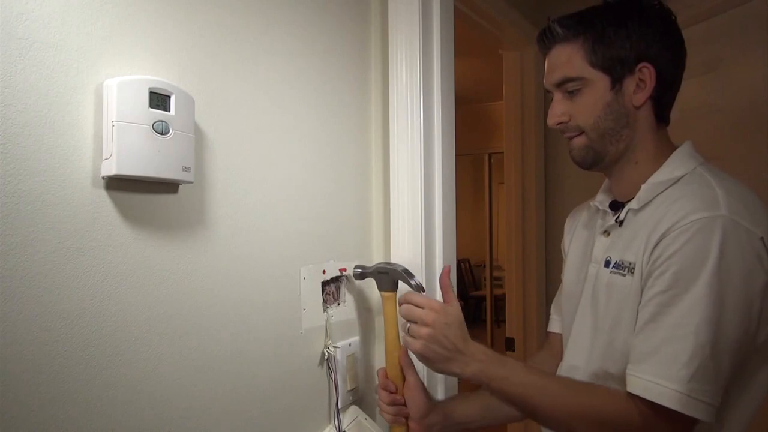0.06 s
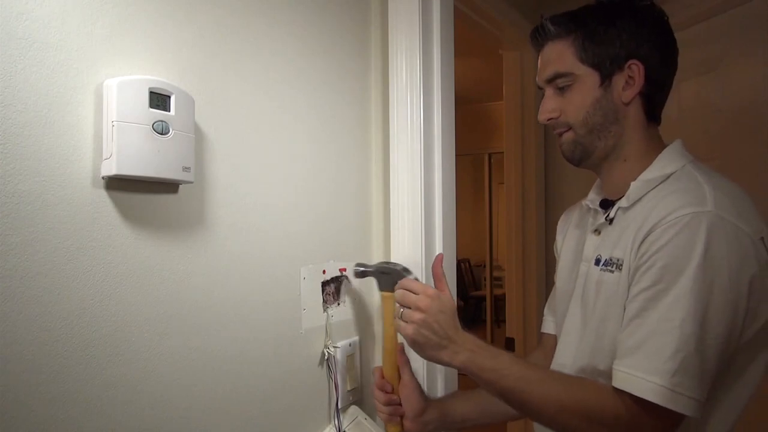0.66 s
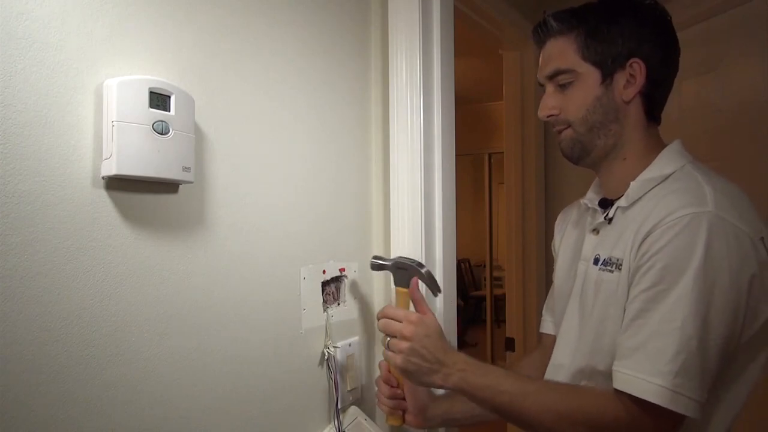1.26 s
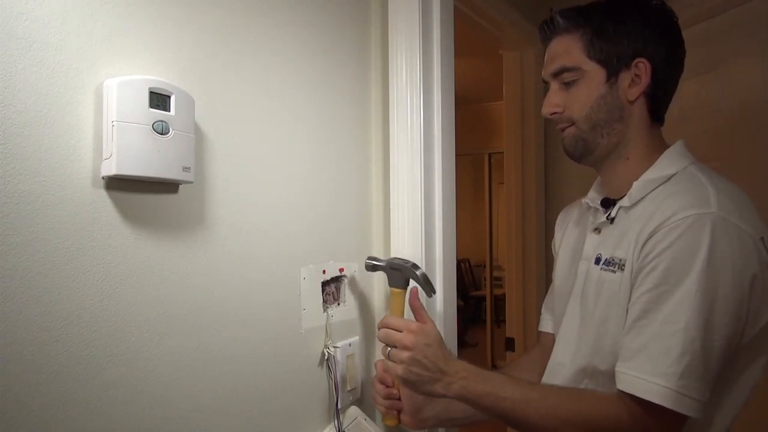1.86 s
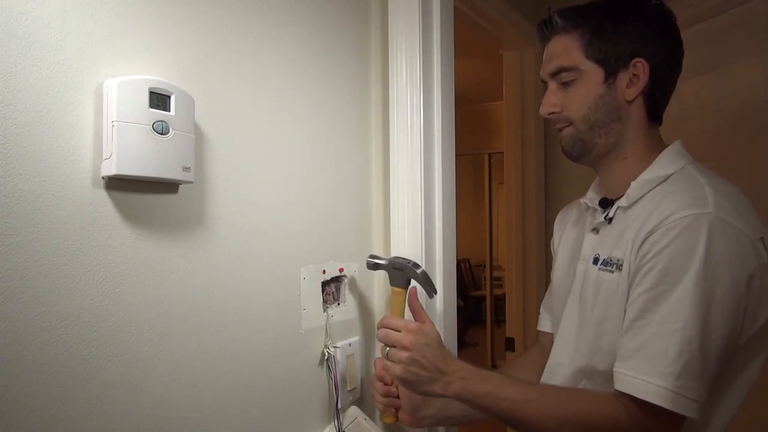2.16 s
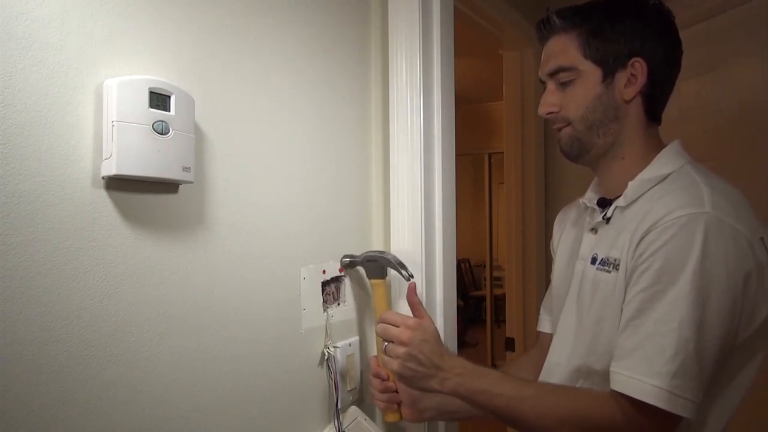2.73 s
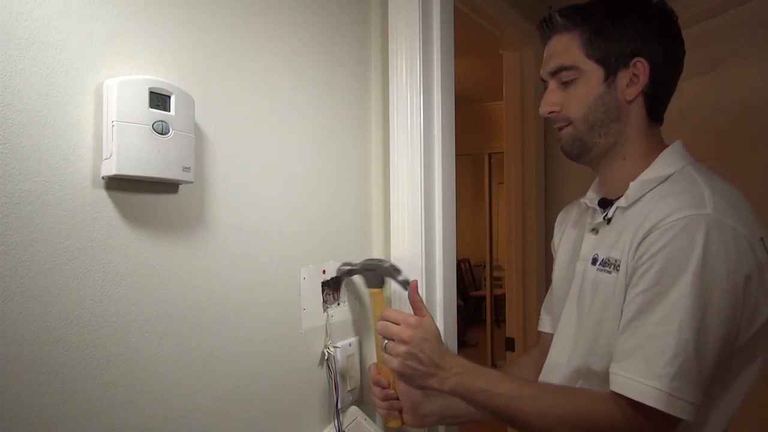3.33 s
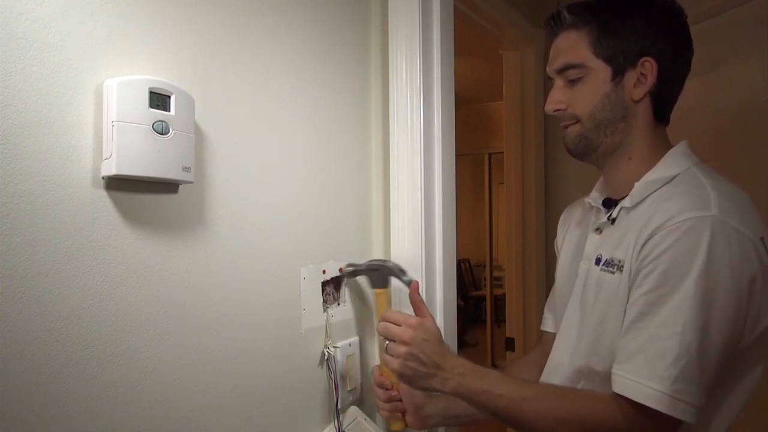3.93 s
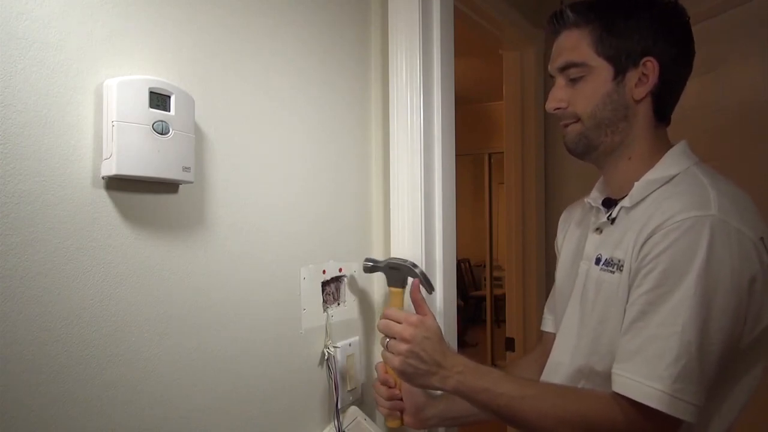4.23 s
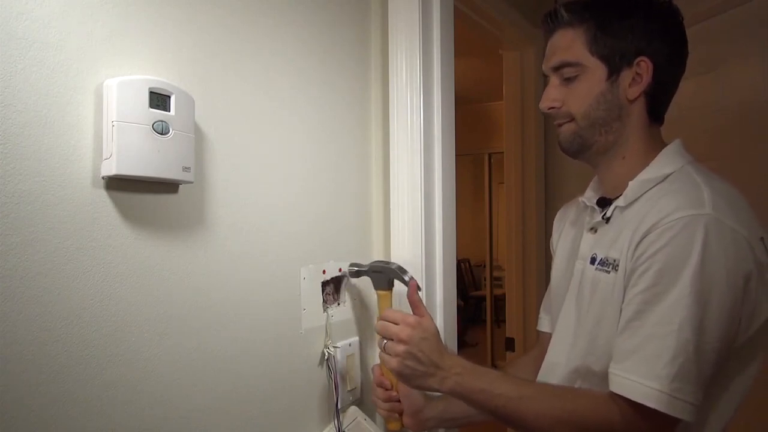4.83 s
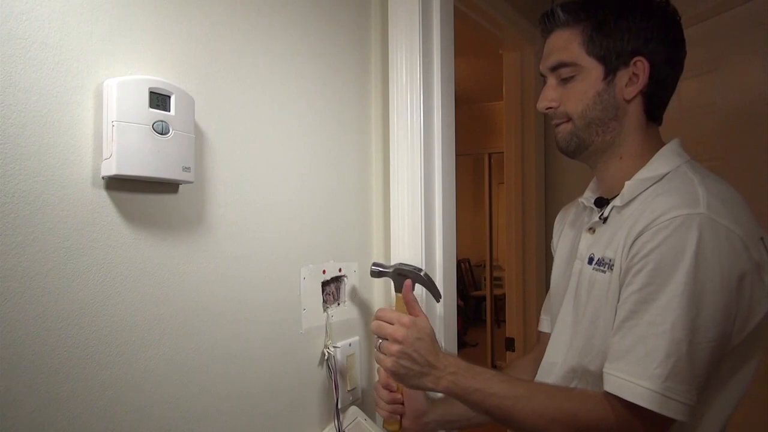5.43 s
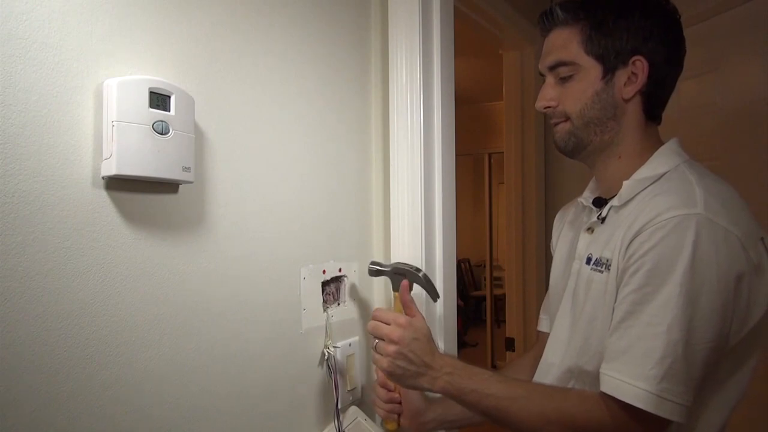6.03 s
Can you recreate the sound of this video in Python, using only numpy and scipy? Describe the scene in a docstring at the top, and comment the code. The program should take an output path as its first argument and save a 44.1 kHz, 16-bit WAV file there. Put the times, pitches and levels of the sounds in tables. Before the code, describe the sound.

A steel hammer taps a plastic anchor into a hollow plasterboard wall, sixteen blows at about three a second. Each has a click, a dull or bright snap and a short boom from the wall. The knock grows fuller as the anchor seats, and the last four blows have a muffled rebound, the final one coming after a brief pause. The microphone is close, in a small hallway with a low rumble.

```python
"""A small hallway: a claw hammer taps a plastic anchor into a hollow plasterboard wall, sixteen blows.
Each blow clicks, booms the wall panel and sets board and room ringing; where the plastic slips it
adds a snap, dull or bright. As the anchor seats the knock deepens, and a dull rebound follows each
of the last four blows. A limiter holds the peaks over a low room rumble."""
import sys
import numpy as np
from scipy import signal
from scipy.fft import rfft, irfft, next_fast_len
from scipy.io import wavfile
from scipy.ndimage import uniform_filter1d, minimum_filter1d

SR = 44100
rng = np.random.default_rng(int(sys.argv[2]) if len(sys.argv) > 2 else 0)


def unload_wav(signal):
    """Save mono or channel-first audio to the path in sys.argv[1] as 16-bit WAV at rate SR, clipped to [-1, 1]."""
    wavfile.write(
        sys.argv[1],
        SR,
        np.round(np.clip(np.atleast_2d(signal).T, -1, 1) * 32767).astype(np.int16),
    )


N = 268128
SIZE = 32768  # samples in one hit; hits are shaped as spectra over HZ
HZ = np.fft.rfftfreq(SIZE, 1 / SR)
AGE = np.arange(SIZE) / SR  # seconds since contact

# tone of the dense ringing of board and hallway: freq_hz, level_db
RING_EQ = [(40, 2.5), (130, 21.5), (220, 27), (285, 25.5), (370, 29), (550, 25), (850, 21.5), (1050, 16),
           (1550, 12), (1900, 10), (2200, 4), (3300, 3), (5800, -8), (7800, -18), (13000, -30)]


def amp(db):
    """Decibels to gain."""
    return 10 ** (np.asarray(db) / 20)


def along(points, hz):
    """Read a curve of (freq_hz, value) points on a log frequency axis."""
    freqs, values = np.transpose(points)
    return np.interp(np.log(hz + 1), np.log(freqs + 1), values)


def eq(points):
    """Minimum-phase EQ through (freq_hz, gain_db) points: nothing rings ahead of the attack."""
    cepstrum = irfft(np.log(amp(along(points, HZ))))
    cepstrum[1:SIZE // 2] *= 2
    cepstrum[SIZE // 2 + 1:] = 0
    return np.exp(rfft(cepstrum))


def noise(points):
    """Steady noise of rms 1, coloured by (freq_hz, gain_db) points."""
    size = next_fast_len(N + SIZE)
    colour = amp(along(points, np.fft.rfftfreq(size, 1 / SR)))
    x = irfft(rfft(rng.standard_normal(size)) * colour, size)[:N]
    return x / np.std(x)


def place(track, start_s, db, hit):
    """Lay a hit into the track with its tail faded out."""
    fade = np.clip((AGE[-1] - AGE) * 10 - 1, 0, 1)
    part = track[round(start_s * SR):][:SIZE]
    part += (amp(db) * fade * hit)[:len(part)]


def room_tone(rumble_db=-33, air_db=-50, hiss_db=-67.5, fall_db=4):
    """The building's low rumble, with a faint rush of air and a thin hiss that both slowly sink."""
    # colours of the three noise beds: freq_hz, gain_db
    rumble_eq = [(15, -7.5), (40, 0.5), (72, -2.5), (105, -25), (145, -10), (180, -9.5), (230, -18.5),
                 (320, -27.5), (600, -64)]
    air_eq = [(150, -9), (380, 1.5), (560, 0.5), (720, 3), (1100, -4), (1550, -7.5), (2100, -13.5),
              (4000, -19), (7000, -26.5)]
    hiss_eq = [(1000, -5), (3000, 3), (7000, 4.5), (16000, -2.5)]
    sink_db = fall_db * np.arange(N) / N
    air = amp(air_db - sink_db) * noise(air_eq)
    hiss = amp(hiss_db - sink_db) * noise(hiss_eq)
    return amp(rumble_db) * noise(rumble_eq) + air + hiss


def diffuse(early_db=7, early_s=0.0078, rise_s=0.0005, smooth_hz=90):
    """Spectrum of countless modes and reflections: strong near walls, then a tail dying by band."""
    # decay of board and hallway: freq_hz, t60_s
    decay = [(100, 0.65), (400, 0.38), (1200, 0.33), (3000, 0.46), (6000, 0.36), (11000, 0.17)]
    hz, t, bands = signal.stft(rng.standard_normal(SIZE), SR, nperseg=256)
    bands = bands * amp(-60 * t / along(decay, hz)[:, None])
    tail = signal.istft(bands, SR, nperseg=256)[1][:SIZE]
    near_walls = amp(early_db * np.exp(-AGE / early_s))
    response = rfft(tail * near_walls * (1 - np.exp(-AGE / rise_s)))
    bell = signal.windows.hann(2 * int(smooth_hz / HZ[1]) + 1)
    power = signal.convolve(np.abs(response) ** 2, bell / bell.sum(), mode="same", method="direct")
    return response / np.sqrt(power)  # equal energy in every band


def ringing(spot):
    """Board and hallway ring: one spot sounds alike each time in the bass, different in the treble."""
    # part of the ringing that changes from blow to blow: freq_hz, power_share
    variation = [(200, 0.05), (900, 0.03), (2200, 0.07), (5000, 0.5)]
    fresh = along(variation, HZ)
    return (np.sqrt(1 - fresh) * spot + np.sqrt(fresh) * diffuse()) * eq(RING_EQ)


def brushes(t60_s=0.28):
    """Hand and hammer brush the wall between blows: a thin ring, cut short by an extra decay."""
    # light touches: start_s, level_db
    touches = [(1.002, -13), (1.013, -13.5)]
    # thin tone of a light contact: freq_hz, gain_db
    light_eq = [(100, -20), (450, -10), (800, 0), (1150, 3), (1700, -2), (3000, 0), (8000, 0)]
    track = np.zeros(N)
    for start_s, db in touches:
        ring = irfft(diffuse() * eq(RING_EQ) * eq(light_eq))
        place(track, start_s, db, ring * amp(-60 * AGE / t60_s))
    return track


def thud():
    """The board around the anchor gives under the blow and springs back within a few swings."""
    # heavily damped swings: pitch_hz, level_db, peak_s
    swings = [(109.6, -12.5, 0.0093), (196, -16.5, 0.0071)]
    hz, db, peak_s = np.transpose(swings)[:, :, None]
    swell = AGE / peak_s * np.exp(1 - AGE / peak_s)
    return rfft(np.sum(amp(db) * swell * np.sin(2 * np.pi * hz * AGE), axis=0))


def panel_boom(scatter_db=1, rise_s=0.0056):
    """The wall's modes start together; the lowest swings against the rest, beating with the next."""
    # modes of the panel and, above 2 kHz, of anchor and hammer head: pitch_hz, level_db, t60_s
    wall_modes = [(34.54, -15.5, 0.69), (47.13, -16, 0.55), (86.7, -21, 0.44), (107.8, -18.5, 0.4),
                  (131.2, -32, 0.53), (146.9, -19.5, 0.49), (176.6, -19, 0.42), (207.2, -23.5, 0.53),
                  (236, -26.5, 0.53), (351.4, -24, 0.44), (399.6, -25, 0.39), (486.7, -18, 0.15),
                  (514, -28, 0.38), (658, -31, 0.18), (757, -43, 0.39), (843.6, -21, 0.14),
                  (870, -22.5, 0.094), (927, -33.5, 0.22), (1015, -37, 0.37), (1169, -22.5, 0.095),
                  (1320, -52, 0.18), (1850, -41, 0.32), (2400, -39, 0.18), (2690, -54, .25),
                  (3260, -57, 0.16), (3460, -54, 0.16)]
    hz, db, t60 = np.transpose(wall_modes)[:, :, None]
    polarity = np.where(hz == hz.min(), 1, -1)
    envelope = amp(db + scatter_db * rng.standard_normal(db.shape) - 60 * AGE / t60)
    boom = np.sum(polarity * envelope * np.sin(2 * np.pi * hz * AGE), axis=0)
    return rfft(boom * (1 - np.exp(-AGE / rise_s)))


def rebounds(push, spot):
    """The hammer lands a second time, softly: a muffled knock with little ringing."""
    # second contacts: start_s, level_db
    bounces = [(4.4155, -4), (4.7851, 0), (5.1685, -1), (5.83, 1)]
    # dull tone of a soft contact: freq_hz, gain_db
    soft_eq = [(60, -10), (250, 0), (1200, 0), (2500, -8), (6000, -22)]
    track = np.zeros(N)
    for start_s, db in bounces:
        knock = amp(0.5) * push + amp(-2) * thud() + amp(-8.5) * ringing(spot)
        place(track, start_s, db, irfft(knock * eq(soft_eq)))
    return track


def anchor_slip(snap_db, reach_hz, from_hz=1710, slope=6.9):
    """A blow's colour in dB: bare contact plus plastic snap, reaching higher the more abrupt the slip."""
    # tone of a blow that does not move the anchor: freq_hz, gain_db
    bare_eq = [(1260, -0.5), (2580, -5.5), (3570, -9.5), (5640, -2.5), (8000, -2.5)]
    snap_band = 1 / (1 + (from_hz / (HZ + 1)) ** slope) / (1 + (HZ / reach_hz) ** slope)
    return 10 * np.log10(amp(along(bare_eq, HZ)) ** 2 + amp(snap_db) ** 2 * snap_band)


def steel_tick(snap_db, reach_hz, base_db=6, pivot_hz=5000, db_per_octave=7):
    """Top-end shelf on the click, in dB: the steel ticks harder with a louder, brighter snap."""
    # shape of the shelf: freq_hz, share_of_gain
    shelf = [(6000, 0), (10000, .2), (14000, 1)]
    tick_db = base_db + snap_db + db_per_octave * np.log2(reach_hz / pivot_hz)
    return tick_db * along(shelf, HZ)


def door_frame_echo(level_db=-9, delay_s=0.0048):
    """The click slaps back from the door frame beside it."""
    # the reflection loses its top treble: freq_hz, gain_db
    frame_eq = [(6000, -4), (13000, -8)]
    return amp(level_db) * eq(frame_eq) * np.exp(-2j * np.pi * HZ * delay_s)


def hammer_blows(push, spot, click_colour=0.51, boom_db=-0.5, seat_blow=4.26, seat_spread=0.91):
    """Steel drives plastic into board: a click over the wall's body, both coloured by the anchor."""
    # the blows and the anchor's snap in each: start_s, level_db, snap_db, reach_hz
    taps = [(0.423, 1.5, -9, 9000), (0.7524, 2, 3.5, 4040), (1.0596, 1, 3.5, 3330), (1.389, 2, 3, 2920),
            (1.6927, 1.5, 6.5, 9000), (2.0127, 1.5, 5, 6300), (2.3197, .5, 0.5, 2400),
            (2.7195, -0.5, -25, 9000), (3.0798, 1, 3, 7900), (3.3998, 1.5, 5, 3080), (3.694, 1, 3.5, 2800),
            (4.0041, 1, 2, 3830), (4.3513, 0, 3.5, 6600), (4.729, 0.9, 0.5, 8700), (5.1024, 0.2, -1, 6700),
            (5.7749, 2.5, 1, 3000)]
    # a seated anchor passes on more knock and less boom: freq_hz, db_per_unit_depth
    seating = [(40, -0.5), (100, -0.45), (160, 2), (230, 4), (320, -0.36), (520, 2), (1000, 1.5),
               (2600, 1.5)]
    track = np.zeros(N)
    heave, echo = thud(), door_frame_echo()
    for blow, (start_s, db, snap_db, reach_hz) in enumerate(taps):
        depth = np.tanh((blow - seat_blow) / seat_spread)  # -1 loose to 1 seated
        grip = eq(np.array(seating) * [1, depth])
        slip_db = anchor_slip(snap_db, reach_hz)
        body = (heave + amp(boom_db) * panel_boom() + ringing(spot)) * eq(np.c_[HZ, slip_db])
        click_db = click_colour * slip_db + steel_tick(snap_db, reach_hz)
        click = push * (1 + echo) * eq(np.c_[HZ, click_db])
        place(track, start_s, db, irfft(grip * (click + body)))
    return track


def limiter(x, ceiling_db=-6.6, release_db_per_s=50):
    """The gain drops at once under each peak and creeps back."""
    climb = release_db_per_s * np.arange(N) / SR
    needed_db = np.minimum(0, ceiling_db - 20 * np.log10(np.abs(x) + 1e-9))
    gain_db = np.minimum.accumulate(needed_db - climb) + climb
    return x * amp(uniform_filter1d(minimum_filter1d(gain_db, size=31), size=31))


def scene():
    """Mono, close to the wall: blows and rebounds land on one spot, over brushes and room tone."""
    # first push of the hammer face on the wall: freq_hz, level_db
    push_eq = [(30, 15.5), (150, 20), (450, 21.5), (800, 13), (1500, 4), (2400, -2), (4000, -5.5),
               (7000, -18), (10000, -24.5), (16000, -54)]
    push = -eq(push_eq)
    spot = diffuse()  # the ringing that every hit on the anchor shares
    return (hammer_blows(push, spot) + rebounds(push, spot) + brushes() + room_tone())[None]


def record(dry, top_hz=16000):
    """Limiter, then a brick-wall high cut."""
    size = next_fast_len(N + SIZE)
    passband = np.fft.rfftfreq(size, 1 / SR) < top_hz
    return irfft(rfft(limiter(dry[0]), size) * passband, size)[None, :N]


dry = scene()
out = record(dry)
unload_wav(out)
```